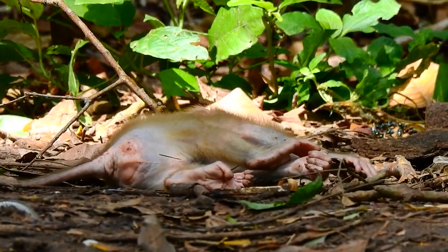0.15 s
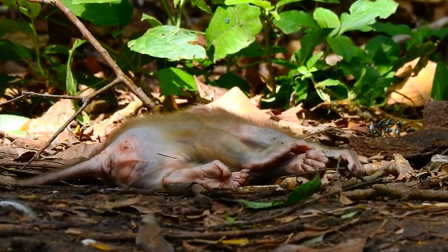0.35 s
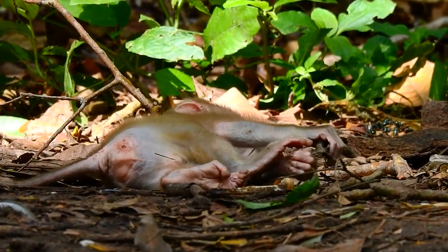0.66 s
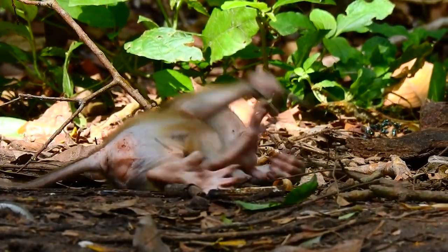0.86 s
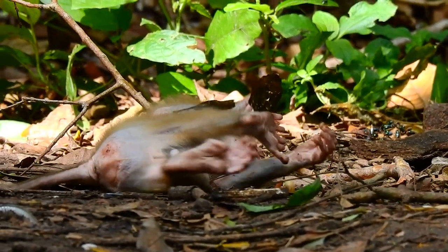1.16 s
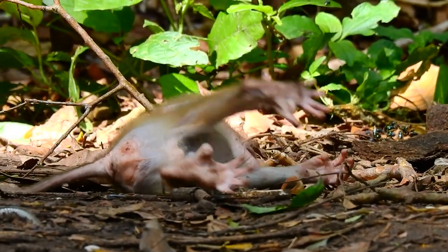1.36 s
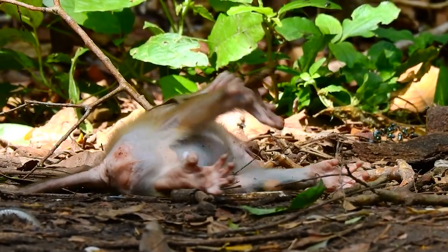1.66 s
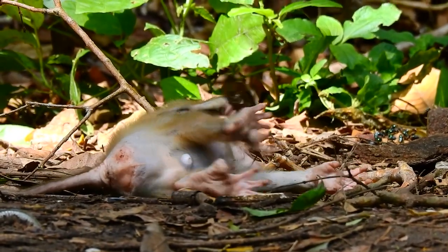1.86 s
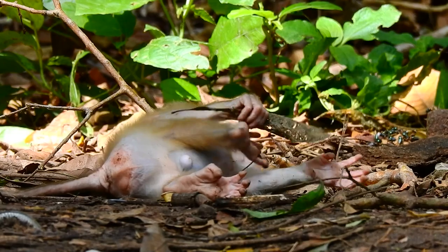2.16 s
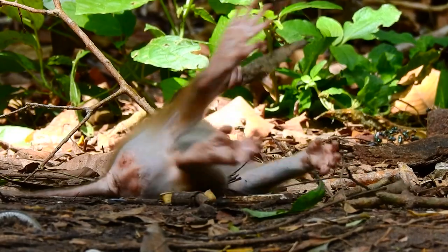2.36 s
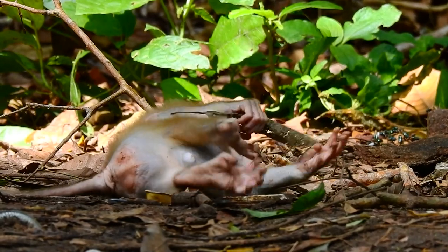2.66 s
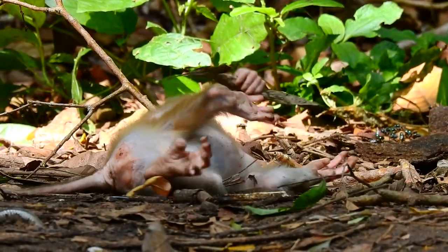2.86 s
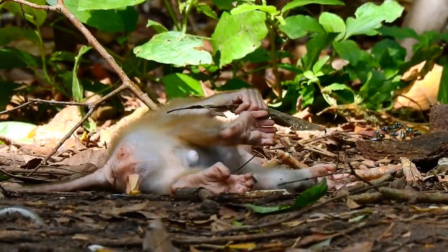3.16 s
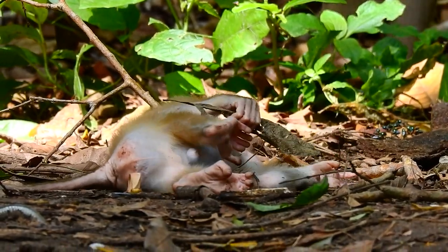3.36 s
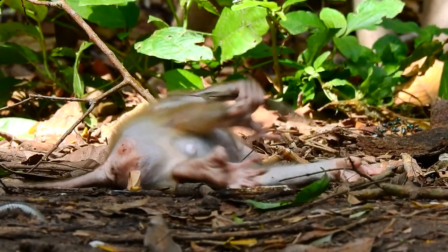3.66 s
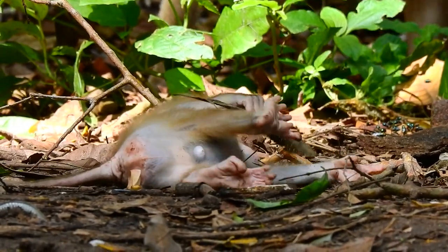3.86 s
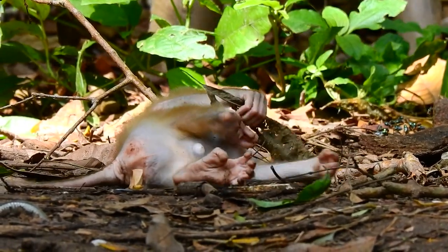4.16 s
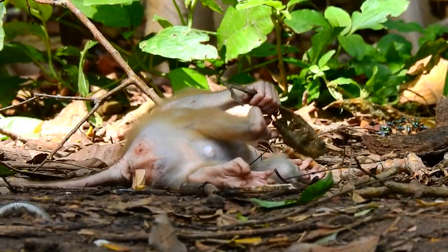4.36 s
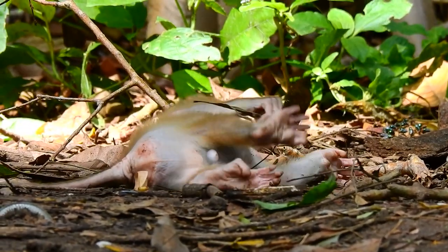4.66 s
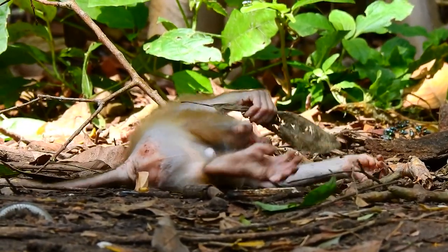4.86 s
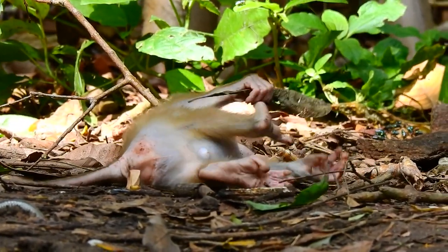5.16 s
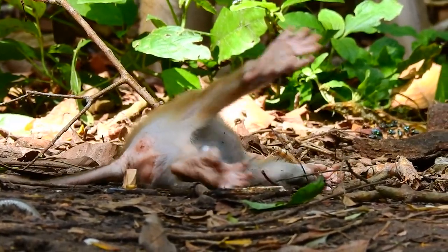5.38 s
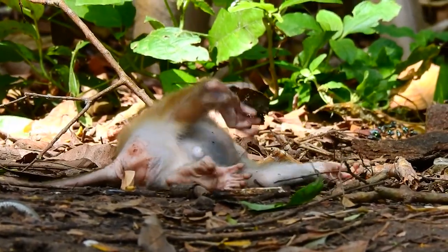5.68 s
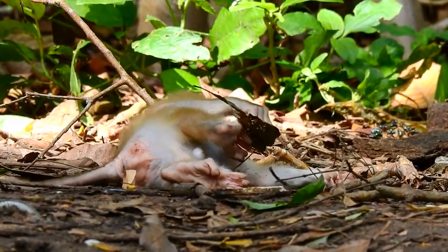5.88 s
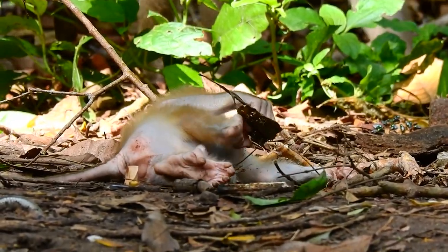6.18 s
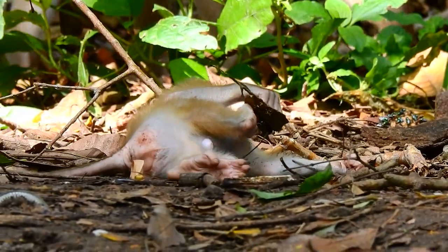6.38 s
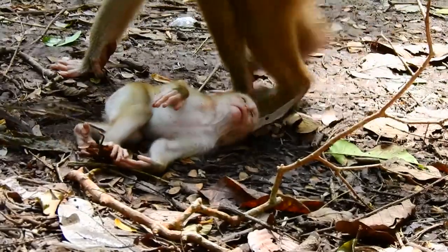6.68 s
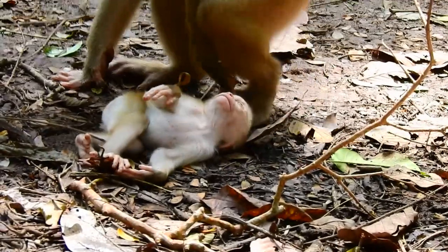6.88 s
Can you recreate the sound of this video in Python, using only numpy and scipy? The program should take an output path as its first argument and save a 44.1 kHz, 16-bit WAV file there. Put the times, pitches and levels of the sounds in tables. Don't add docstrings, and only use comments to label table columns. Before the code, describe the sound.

A baby monkey squeals in a fast run of short, raspy high squeaks over quiet forest hiss, then abruptly cuts to near-silent forest.

```python
import sys
import numpy as np
from scipy import signal
from scipy.fft import rfft, irfft, next_fast_len
from scipy.io import wavfile
from scipy.ndimage import uniform_filter1d, map_coordinates

SR = 44100
rng = np.random.default_rng(int(sys.argv[2]) if len(sys.argv) > 2 else 0)


def dump_mix(stems):
    frames = np.atleast_2d(stems).T
    limited = np.clip(frames, -1, 1)
    pcm = np.round(limited * 32767).astype(np.int16)
    wavfile.write(sys.argv[1], SR, pcm)


def undo_db(level):
    steps = np.asarray(level, float) / 20
    return 10 ** steps


N = 309758


def unit(x):
    return x / np.sqrt(np.mean(x ** 2) + 1e-20)


def along(points, hz, order=1):
    rows = np.transpose(points)
    return np.interp(np.log(hz + 1), np.log(rows[0] + 1), rows[order])


def wobble(rate, size=N):
    knots = rng.standard_normal(int(size * rate / SR) + 4)
    return map_coordinates(knots, [np.arange(size) * rate / SR])


def filtered(x, response):
    m = next_fast_len(N + SR // 2)
    return irfft(rfft(x, m) * response(np.fft.rfftfreq(m, 1 / SR)), m)[..., :N]


def modes(rows):
    def response(f):
        total = 0
        for k, (centre, width, db) in enumerate(rows):
            damping = 1j * f * width
            total = total + (-1) ** k * undo_db(db) * damping / (centre * centre - f * f + damping)
        return total
    return response


def glide(row, jitter, flutter_db, rate, arch=0):
    _, length, start_hz, end_hz, db = row
    u = np.arange(round(length * SR)) / (length * SR)
    hz = (start_hz + (end_hz - start_hz) * u) * (1 + arch * np.sin(np.pi * u))
    hz = hz * (1 + jitter * wobble(rate, size=len(u)))
    shape = np.sin(np.pi * u ** 0.7) ** 0.52 * undo_db(db + flutter_db * wobble(rate, size=len(u)))
    return hz, 2 * np.pi * np.cumsum(hz) / SR, shape


# hz, left-right likeness
COHERENCE = [(60, 0.99), (180, 0.96), (550, 0.9), (1650, 0.72), (4970, 0.38), (15000, -0.59)]


def rush(spectrum, patchy_db):
    z = signal.stft(rng.standard_normal((2, N)), nperseg=512)[2]
    field = uniform_filter1d(rng.standard_normal(z.shape[1:]), 5, 0)
    field = uniform_filter1d(field, 10, 1)
    pair = signal.istft(z * undo_db(patchy_db * unit(field)), nperseg=512)[1][:, :N]

    def response(hz):
        turn = np.arccos(np.clip(along(COHERENCE, hz), .08, 1)) / 2
        return undo_db(along(spectrum, hz)) * [np.cos(turn), np.sin(turn)]

    mid, side = filtered(pair, response)
    return unit(np.array([mid + side, mid - side]))


# hz, density_db
RUMBLE = [(15, -54), (25, -20.5), (90, -6.5), (113, -2), (204, -4), (244, -7), (300, -13), (390, -46),
          (660, -120)]
DRONE = [(150, -38.5), (240, -2), (400, -1), (600, -6.5), (900, -20.5), (1400, -55)]
HISS = [(350, -26.5), (600, -4.5), (706, -5.5), (867, -4.5), (1360, -6), (2020, -9), (2650, -9.5),
        (3520, -12.5), (4320, -8), (5520, -5), (7450, -5), (8770, -20), (15500, -47)]
SELF_NOISE = [(6000, -31.5), (9000, -3.5), (12000, -8.5), (15600, -6.5)]
# time_s, level_db
DRONE_SWELL = [
    (0, -55.5),
    (.6, -58.5),
    (1.1, -53),
    (2.6, -54.5),
    (4.8, -57.5),
    (5.6, -61.5),
    (6.3, -61),
    (7.02, -64),
]
# from_s, to_s
PAUSE = (6.271, 6.52)


def forest():
    t = np.arange(N) / SR
    moved = t > PAUSE[1]
    spot_db = moved * (-1.5 - 3.5 * (t - PAUSE[1]))
    drone_db = np.interp(t, *np.transpose(DRONE_SWELL))
    hiss_db = -52.5 + 0.33 * (drone_db - drone_db.mean())
    swell = wobble(6)
    rumble = undo_db(-51.5 - 2.5 * moved + swell) * rush(RUMBLE, patchy_db=0.9)
    drone = undo_db(drone_db + swell) * rush(DRONE, patchy_db=2.0)
    hiss = undo_db(hiss_db + .5 * swell) * rush(HISS, patchy_db=2.36)
    return undo_db(spot_db) * (rumble + drone + hiss) + undo_db(-80.0) * rush(SELF_NOISE, patchy_db=2.5)


# start_s, length_s, start_hz, end_hz, level_db
BIRDS = [
    (0.115, 0.19, 4260, 4150, -60),
    (.37, .05, 4100, 4250, -63),
    (0.499, .07, 3830, 3830, -59),
    (.66, .06, 4150, 4430, -63),
    (.715, .22, 4430, 4450, -61),
    (6.604, 0.028, 6860, 5200, -50),
]
# start_s, length_s, start_hz, end_hz, level_db
INSECT = (6.5, .27, 5161.5, 5150, -61)


def birds():
    out = np.zeros(N)
    for row, blur in [(bird, 1) for bird in BIRDS] + [(INSECT, 4)]:
        hz, phase, shape = glide(row, jitter=.006 * blur, flutter_db=2.5, rate=90 * blur)
        out[round(row[0] * SR):][:len(hz)] += shape * np.sin(phase)
    return out


# start_s, peak_db, centre_hz
TICKS = [(0.154, -34.5, 1630), (0.453, -28.5, 6500), (.454, -33.5, 5300), (.35, -43, 7300),
         (0.584, -36, 6900), (1.414, -36, 6310), (1.6, -35, 7040), (6.548, -43, 5100), (6.581, -48, 5047),
         (6.739, -51, 1750), (6.754, -48, 4780), (6.854, -44, 6600)]


def ticks():
    out, t = np.zeros(N), np.arange(SR // 40) / SR
    for s, db, hz in TICKS:
        crackle = undo_db(-60 * t / 0.024) * rng.standard_normal(len(t))
        ring = signal.lfilter(*signal.iirpeak(hz, 3.2, SR), crackle)
        out[round(s * SR):][:len(t)] += undo_db(db + 1.1) * (ring + .04 * crackle) / abs(ring).max()
    return filtered(out, lambda f: 1 / (1 + (f / 8200) ** 6))


# hz, t60_s, level_db
TRUNKS = [(1493, 0.13, 1.5), (3300, 0.12, 5.5), (4150, 0.65, -8), (6470, 0.89, -5), (7600, 0.43, -0.5),
          (9000, 0.52, 1), (12000, 0.13, -0.5)]


def trunks(x):
    hz, t, z = signal.stft(rng.standard_normal((2, SR * 3 // 4)), SR, nperseg=256)
    z = z + 0.73 * z[:1]
    decay_db = along(TRUNKS, hz, order=2)[:, None] - 60 * t / along(TRUNKS, hz)[:, None]
    tail = signal.istft(z * undo_db(decay_db), SR, nperseg=256)[1]
    tail = tail / np.linalg.norm(tail, axis=1)[:, None]
    delayed = np.pad(x, (200, 0))[None]
    return signal.fftconvolve(delayed, tail, axes=1)[:, :N]


# start_s, peak_db, dip_after_s, dip_db, chest_db
GRUNTS = [(.105, -39, 0.031, -75, -41.5), (0.763, -48.5, 0.0099, -48, -41.5),
          (.95, -29.5, 0.037, -35, -33.5), (1.171, -27, 0.064, -36, -32.5), (1.432, -25, 0.048, -31, -37.5),
          (1.716, -22, 0.046, -44, -44.5), (1.952, -32, 0.051, -46, -42), (2.144, -34, .058, -48.5, -45),
          (2.325, -44, .02, -48, -54), (2.369, -31, 0.059, -36.5, -38.5),
          (2.621, -25.5, .052, -35.5, -38.5), (2.887, -27, .046, -37, -44.5),
          (3.122, -30.5, 0.041, -43, -46.5), (3.335, -36, 0.031, -49.5, -48.5),
          (3.554, -36, 0.048, -42.5, -44), (3.757, -29, 0.056, -35, -38),
          (4.024, -29.5, 0.033, -31.5, -39.5), (4.3, -31, 0.068, -30, -41), (4.564, -33, 0.041, -33.5, -38),
          (4.825, -30.5, 0.049, -33, -39), (5.1, -32.5, 0.044, -36, -43),
          (5.402, -28.5, 0.058, -25.5, -43.5), (5.688, -35.5, 0.063, -38.5, -45.5),
          (5.985, -44, 0.093, -41, -46)]
# peak_s, peak_db, release_s, tongue_hz, throat_share_db
PUSHES = [(.16, -60, .015, 2230, -5.5), (0.784, -53, 0.009, 1510, -18), (1.021, -38, 0.014, 2700, -9),
          (1.235, -23, 0.062, 3300, -2.5), (1.5, -17.5, 0.049, 3220, -3), (1.798, -28, 0.013, 3240, -5.5),
          (2.016, -28.5, 0.011, 2900, -5), (2.215, -31, 0.028, 2540, -4), (2.356, -42.5, 0.014, 2000, -21),
          (2.44, -22, 0.051, 2950, -4), (2.687, -19.5, 0.056, 3150, -3.5), (2.967, -29, 0.011, 3040, -5),
          (3.192, -39.5, 0.013, 2800, -3), (3.405, -42, 0.011, 2750, -4.5), (3.621, -42, .029, 2640, -3.5),
          (3.827, -24, 0.07, 3220, -2.5), (4.115, -21.5, 0.054, 3350, -3.5),
          (4.373, -22, 0.067, 3300, -2.5), (4.629, -23.5, 0.077, 3530, -1.5), (4.886, -23, 0.082, 3330, -2),
          (5.185, -26.5, 0.065, 3300, -3), (5.485, -27.5, 0.061, 3250, -2.5), (5.78, -30, 0.044, 3200, -4),
          (6.064, -34.5, .024, 3100, -11)]
CHEST_DB = (-16.5, -4.5, 1, -9, -16.5)
TONGUE_SHIFT = (1.23, 1.255, 1.27, .96, .87)
SHARE_DB = (-2, 0.17, -0.56, 0.035, -3.1)


def curves(s, *levels):
    t = np.arange(N) / SR
    on = sum((t >= row[0]) & (t < row[-1] + .004) for row in s)
    arcs = [38 * np.log10(np.interp(t, s.ravel(), 10 ** (db.ravel() / 38))) for db in levels]
    return [np.where(on, arc, -120) for arc in arcs]


def calls():
    start, grunt_db, sink, dip_db, chest_db = np.transpose(GRUNTS)
    peak, push_db, release, tongue_hz, share_db = np.transpose(PUSHES)
    attack_s = 0.013
    s = np.array([start, start + attack_s, start + sink, peak, peak + release]).T
    s = np.maximum.accumulate(s.ravel()).reshape(len(start), -1)
    effort = np.array([grunt_db - 18.5, grunt_db, dip_db, push_db, push_db - 19]).T
    effort_db, low_db = curves(s, effort, np.add.outer(chest_db, CHEST_DB))

    def track(values):
        return np.interp(np.arange(N) / SR, s.ravel(), values.ravel())

    tongue = track(np.outer(tongue_hz, TONGUE_SHIFT))
    return effort_db, low_db - effort_db, tongue, track(np.add.outer(share_db, SHARE_DB))


# centre_hz, width_hz, level_db
UPPER = [(4450, 2150, 0.5), (5680, 2100, -5.5)]
LOWER = [(1050, 600, -16), (2300, 1500, -10)]
TEETH = [(5824, 1160, 10), (6970, 1750, -7), (7340, 1180, -32), (10370, 3000, -33)]
TONGUE = np.arange(1500, 3800, 300)


def folds():
    cycles = np.cumsum(440 * undo_db(1.5 * wobble(25) + 1.8 * wobble(400))) / SR
    slaps = unit(np.diff(np.floor(cycles), prepend=0) * undo_db(1.3 * rng.standard_normal(N)))
    opening = 0.4 + np.exp(-4 * (cycles % 1))
    air = unit(opening * rng.standard_normal(N))
    edge = 2 * np.pi * np.cumsum(2230 * undo_db(.45 * wobble(65) + .19 * wobble(700))) / SR
    overtones = sum(np.cos(k * edge + k * k) for k in range(1, 5))
    whistle = unit(undo_db(4 * wobble(100)) * opening * overtones)
    subharmonics = sum(np.cos(k * edge / 2) for k in range(1, 4))
    halved = unit(undo_db(5.8 * wobble(110)) * subharmonics)
    bright = .5 * slaps + .9 * air + .76 * whistle
    dull = .25 * slaps + rng.standard_normal(N) + .17 * halved
    return bright, dull


def rasp(lock):
    bright, dull = folds()
    effort_db, low_db, tongue_hz, back_db = calls()
    effort_db = effort_db + 1.5 * wobble(90) - 8 * lock
    back = np.clip(undo_db(back_db - 0.68), 0, .97)

    def throat_path(f):
        return modes(UPPER)(f) / (1 + (3400 / (f + 1)) ** 4) / (1 + (f / 6000) ** 4)

    throat = unit(filtered(bright, throat_path))
    front = unit(filtered(bright, lambda f: modes(TEETH)(f) / (1 + (5000 / (f + 1)) ** 4)))
    fixed = filtered(dull, lambda f: modes(LOWER)(f) / (1 + (f / 3900) ** 6))
    place = np.clip(tongue_hz, TONGUE[0], TONGUE[-1])
    moving = np.zeros(N)
    for hz in TONGUE:
        near = np.clip(1 - abs(place - hz) / 300, 0, 1)
        moving += near * filtered(dull, modes([(hz, 520, 0)]))
    lower = undo_db(low_db - 2.0 + 1.37 * wobble(120)) * unit(fixed + .55 * moving)
    return undo_db(effort_db - 2.5) * (back * throat - np.sqrt(1 - back ** 2) * front + lower)


# hz, level_db
MOUTH = [(1200, -20.5), (2200, -17), (3200, -12), (4500, 7), (5500, -3.5), (6500, 4), (7500, -0.5),
         (9000, -9.5), (14000, -47)]


def notes(rows, slope_db, jitter, flutter_db, rate, firm, arch=0):
    out, lock = np.zeros(N), np.zeros(N)
    for row in rows:
        hz, phase, shape = glide(row, jitter, flutter_db, rate, arch)
        note = np.zeros(len(hz))
        for k in range(1, 6):
            level = undo_db(along(MOUTH, k * hz) + k * slope_db)
            note += level * np.sin(k * phase + k * k) * (k * hz < SR / 2)
        first = round(row[0] * SR)
        out[first:][:len(hz)] += shape * unit(note)
        lock[first:][:len(hz)] = firm * signal.windows.tukey(len(hz), .5)
    return np.array([out, lock])


CLEAR = [
    (1.016, 0.015, 3020, 2830, -32.5),
    (1.268, 0.018, 2240, 2920, -39),
    (1.285, 0.013, 3100, 3140, -27),
    (1.54, 0.013, 3750, 3700, -37),
    (2.01, 0.011, 1940, 2440, -43),
    (2.958, 0.013, 2410, 2220, -41),
    (4.383, .026, 1810, 1518, -31),
    (4.93, 0.011, 2020, 2230, -40),
    (5.772, .016, 1820, 1520, -34),
]
ARCHED = [
    (2.432, .014, 2000, 2290, -31),
    (2.68, .015, 2110, 2220, -27),
    (4.085, .02, 2070, 2215, -25),
    (4.358, 0.018, 2180, 2040, -30),
]
HARSH = [(1.49, 0.033, 2260, 2185, -35), (2.444, 0.029, 2290, 2210, -33), (2.694, 0.011, 2227, 2220, -32),
         (3.82, 0.026, 2154, 2224, -30), (4.105, 0.022, 2190, 2180, -38), (4.128, .028, 2080, 2390, -36),
         (4.62, .027, 2166, 2250, -30.5), (4.878, 0.04, 2168, 2185, -31), (5.163, 0.028, 2130, 2254, -32.5),
         (5.413, 0.075, 2200, 2310, -39), (5.7, .035, 2270, 2290, -41)]
SOFT = [(1, 0.04, 2480, 2415, -45), (1.005, .035, 3050, 2800, -45), (1.03, 0.018, 2460, 2400, -48),
        (1.205, 0.032, 3325, 3330, -33.5), (1.773, 0.011, 3180, 7600, -39.5),
        (2.205, 0.022, 1964, 1920, -44.5), (2.7, 0.042, 2110, 1810, -50.5),
        (3.183, 0.018, 1855, 1840, -45.5), (3.395, 0.019, 3300, 3300, -50.5),
        (3.618, 0.016, 1820, 1870, -51), (3.865, .018, 2776, 2810, -52), (3.822, .02, 2170, 2150, -45),
        (4.128, .028, 2100, 2200, -47), (4.135, .022, 2700, 2550, -50), (4.673, 0.01, 3180, 3270, -41),
        (4.93, 0.017, 1980, 2870, -52.5), (5.205, 0.02, 1890, 2060, -49.5), (6.05, .022, 3050, 3500, -48),
        (5.465, 0.024, 5160, 5110, -40.5)]


def squeaks():
    clear = notes(CLEAR, slope_db=-1.5, jitter=.012, flutter_db=1.5, rate=500, firm=1.4)
    arched = notes(ARCHED, slope_db=-1.5, jitter=.012, flutter_db=1.5, rate=500, firm=1.4, arch=0.1235)
    harsh = notes(HARSH, slope_db=-2.5, jitter=.035, flutter_db=5, rate=900, firm=.45)
    soft = notes(SOFT, slope_db=-19, jitter=.018, flutter_db=3.5, rate=400, firm=.1)
    return clear + arched + harsh + soft


# hz, level_db
ROLL = [(7500, 0), (9000, -16), (11000, -22.5), (15000, -30)]
# hz, left_minus_right_db
PAN = [(500, 11.5), (1500, -0.5), (2800, 7.5), (5500, -2), (10000, 2)]


def scene():
    locked, lock = squeaks()
    voice = filtered(rasp(lock) + locked, lambda hz: undo_db(along(ROLL, hz)))
    sides = np.array([[1], [-1]])

    def ports(hz):
        lag = np.exp(1j * hz * .00006 * sides)
        return undo_db(along(PAN, hz) / 2 * sides) * lag

    near = filtered(voice + ticks(), ports)
    far = birds()
    return near + far + undo_db(-7.5) * trunks(voice + 1.4 * far) + forest()


def low_pass(x):
    return signal.sosfilt(signal.butter(12, 15680, fs=SR, output="sos"), x)


def record(dry):
    t = np.arange(N) / SR
    gate = np.maximum(undo_db(-4000 * np.clip(t - PAUSE[0], 0, 1)), t > PAUSE[1])
    heard = filtered(dry, lambda hz: 1 / (1 + (38 / (hz + 1)) ** 4))
    return low_pass(heard * gate)


dry = scene()
out = record(dry)
dump_mix(out)
```